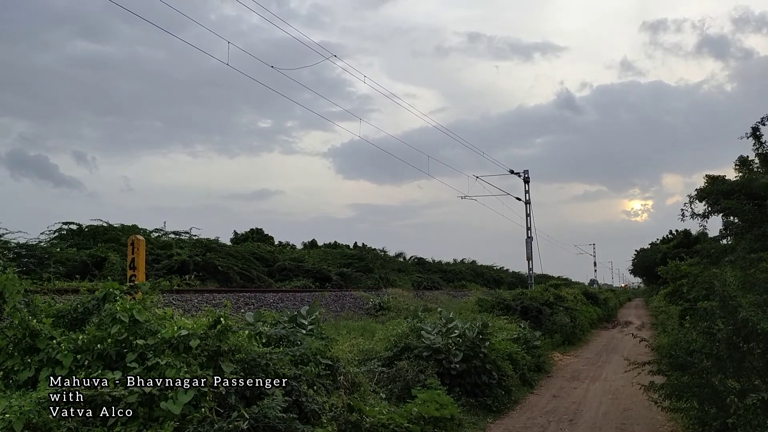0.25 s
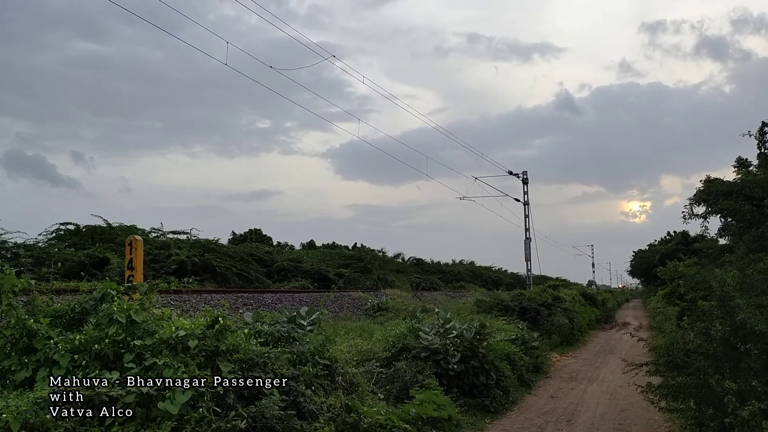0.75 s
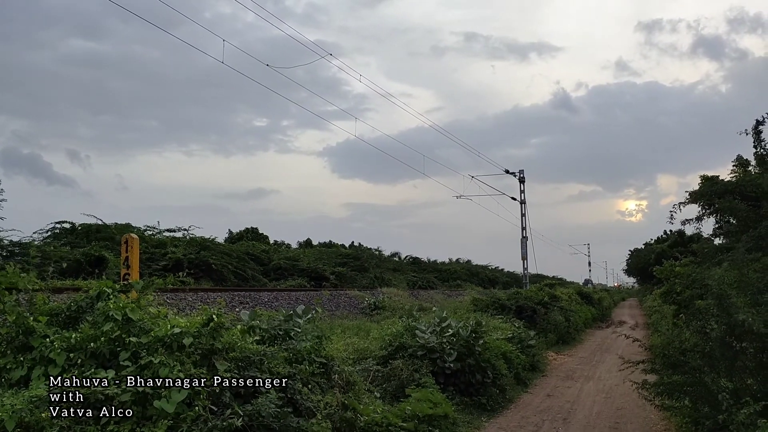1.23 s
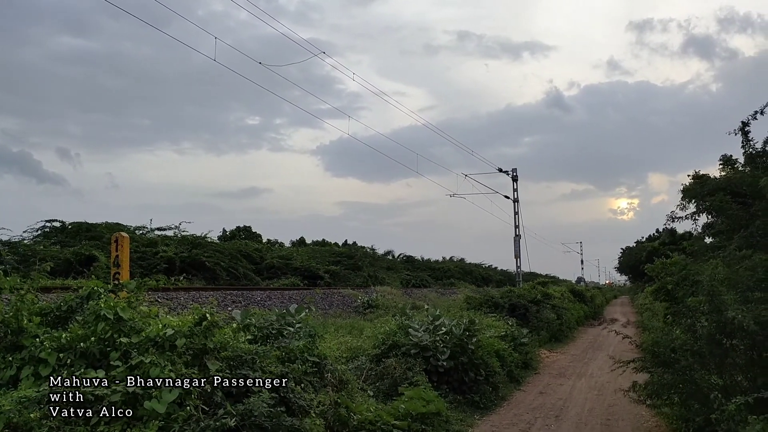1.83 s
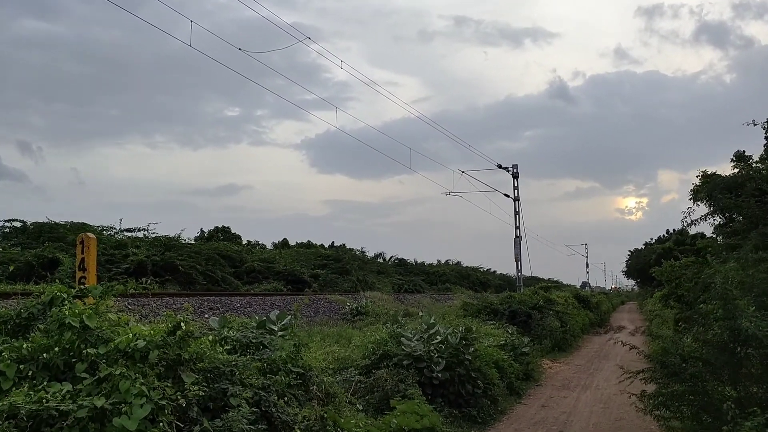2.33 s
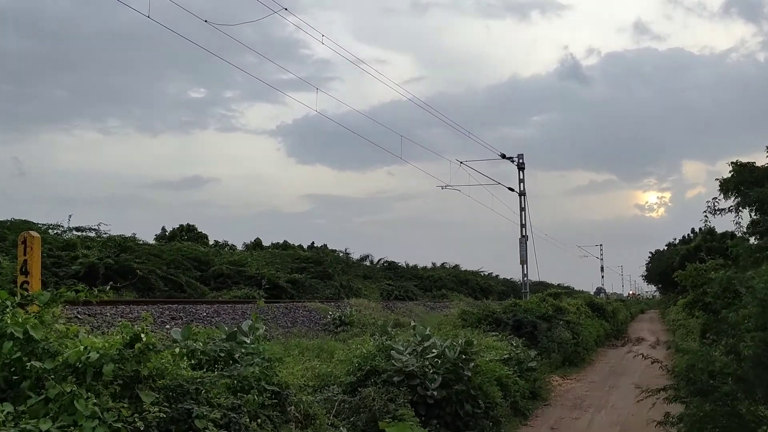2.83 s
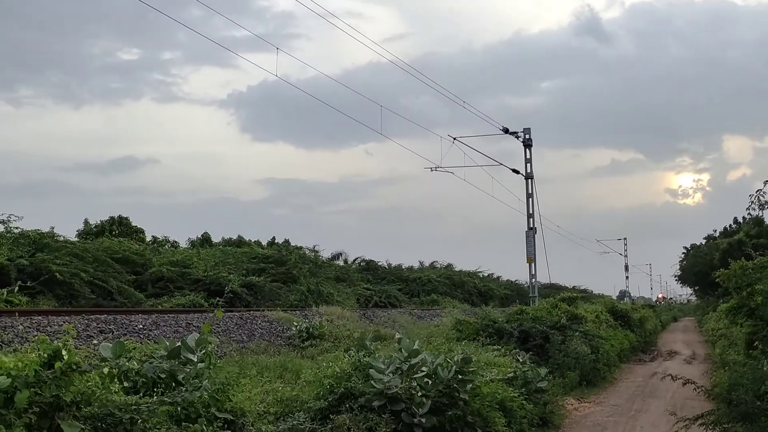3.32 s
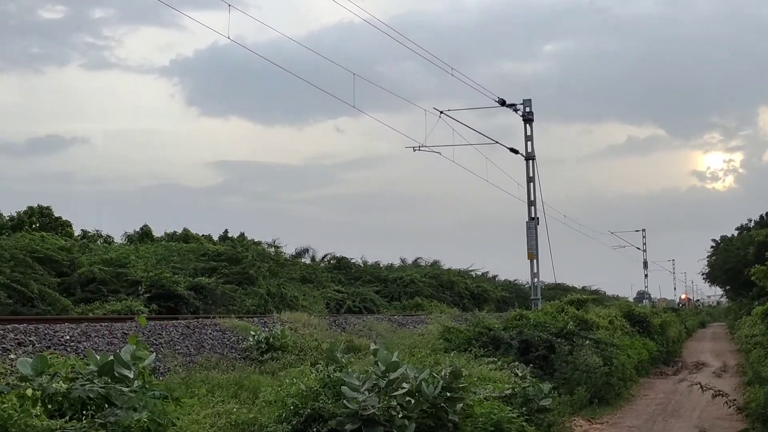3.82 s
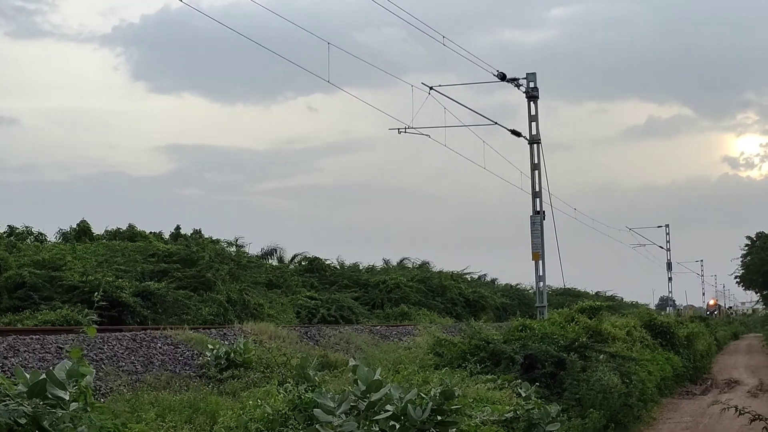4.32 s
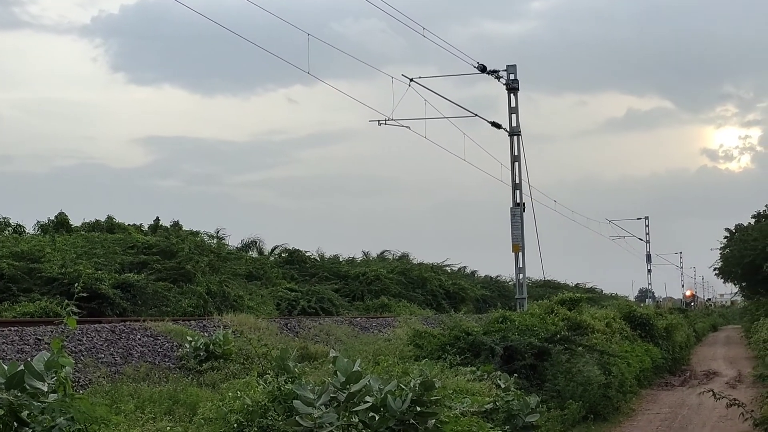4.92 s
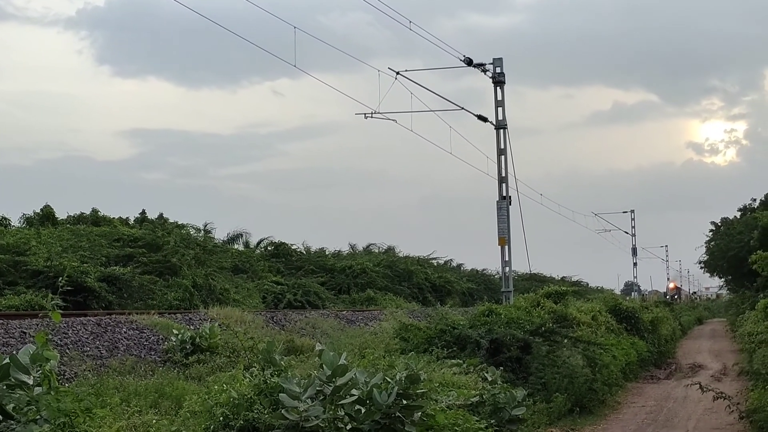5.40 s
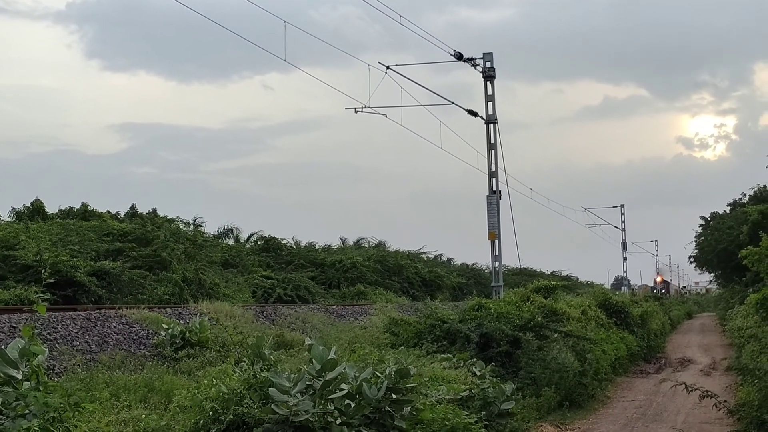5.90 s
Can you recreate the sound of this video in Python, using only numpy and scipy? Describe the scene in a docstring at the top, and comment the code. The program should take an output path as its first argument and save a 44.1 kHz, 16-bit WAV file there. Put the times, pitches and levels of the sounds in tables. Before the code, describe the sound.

Gusty wind thumps the microphone while a far two-tone locomotive air horn sounds long, then short, echoing across scrub alive with insects.

```python
"""A two-chime air horn on a far locomotive, one long and one short blast: stacks of twinkling partials,
air haze, a flat after-hum and a scattered echo from the scrub. Gusts buffet two microphone ports: noise read
at a changing wind speed, over a low rumble. The fields are shaped noise with a chorus of far crickets;
near crickets trill in ringing wing strokes, birds whistle falling tones, and two faint brief tones sound."""
import sys
import numpy as np
from scipy import signal
from scipy.fft import rfft, irfft, next_fast_len
from scipy.io import wavfile
from scipy.ndimage import uniform_filter1d

SR = 44100
rng = np.random.default_rng(int(sys.argv[2]) if len(sys.argv) > 2 else 0)


def waveform_to_disk(signal):
    """Save audio, clipped to [-1, 1], as 16-bit WAV at the path in sys.argv[1]."""
    frames = np.transpose(np.atleast_2d(signal))
    scaled = np.clip(frames, -1, 1) * 32767
    samples = np.round(scaled).astype(np.int16)
    wavfile.write(sys.argv[1], SR, samples)


N = 271215

# Horn blasts: start t/s, valve shuts t/s, release/s, sharpness at start/share of pitch,
# flatness of after-hum/share of pitch, extra level of ringing partial/dB, curve of (t/s, level/dB)
HORN_BLASTS = [(0.563, 2.031, .12, 0.004, 0.015, 3.4, [(.58, -42), (.88, -30), (1.03, -30), (1.35, -25),
               (1.54, -28.5), (1.68, -25), (2.03, -28.5)]),
               (3.587, 4.328, .08, 0.02205, .045, 7.9, [(3.6, -26), (4.33, -24.5)])]
# Chimes, high one first: f/Hz, level of each upper partial under their sum/dB
CHIME_PITCHES = [(473.4, -9), (336.3, -14)]
# Colour of the upper partials after bell, air and ground: f/Hz, level/dB
BELL_COLOUR = [(336, -4), (470, 6), (950, 7), (1010, 9.5), (1400, -2.5), (1700, -4), (2000, 0), (2350, -4),
               (2750, -1.5), (3800, -5), (5200, -7), (7300, -19), (7900, -38), (10000, -42), (12000, -58.5)]
# Horn at the port pair: f/Hz, left minus right/dB, left lead/rad
PORT_DIFFERENCES = [(400, 0, -.35), (1400, 1, -.55), (1750, 5, -2), (2300, 1, -.5), (2800, 4, 1.4),
                    (3400, 5, -.4), (4200, -4, -.7), (6000, 4, 0)]
# Fades of single partials over the long path: t/s, f/Hz, half length/s, depth/dB (negative swells)
PARTIAL_FADES = [(.62, 947, .08, -5), (.74, 473, 0.13, 8), (0.875, 947, 0.091, 11), (0.967, 1009, 0.16, 13),
                 (1.17, 672, 0.046, 12.5), (1.3, 1345, 0.11, -5.5), (1.35, 2018, .15, -5.5),
                 (1.468, 473, 0.2, 8), (1.575, 947, 0.045, 16), (3.724, 473, 0.095, 16.5),
                 (3.75, 2018, .3, 6), (3.86, 1894, 0.071, 13), (4.002, 1009, 0.2, 9),
                 (3.897, 1420, 0.43, -4), (4.16, 947, 0.067, 8), (4.17, 473, 0.21, 13),
                 (4.203, 1345, 0.12, -6.5)]
# Swells of horn bands over the long path: t/s, f/Hz, half length/s, half width/octaves, level/dB
BAND_SWELLS = [(1.046, 2980, 0.1, 0.78, -5), (1.285, 3020, 0.16, 0.29, 4.5), (1.56, 3690, 0.19, 0.13, 7),
               (1.8, 958, 0.25, 0.057, 3.5), (1.8, 4890, 1, .12, -6.5), (4.08, 2970, 0.15, 0.24, -7)]
# Air rushing through the bells: f/Hz, relative level/dB per Hz
HAZE_SPECTRUM = [(700, -11.5), (1400, -9), (2150, -13), (2500, 0.5), (3300, -10), (5000, -2.5),
                 (7300, -16.0), (8200, -32.5), (12000, -49.0)]
# Decay of the scrub echo: f/Hz, time to fall 60 dB/s
ECHO_T60 = [(500, 1.1), (1000, 0.82), (1800, 2.8), (7000, 0.8)]
# Wind rumble: f/Hz, relative level/dB per Hz
RUMBLE_SPECTRUM = [(8, -14), (20, 11), (56, 19), (85, 7), (200, -61)]
# Eddies at unit wind speed: f/Hz, relative level/dB per Hz
EDDY_SPECTRUM = [(30, -41), (80, 0.5), (150, 3.5), (270, -11), (500, -28.5), (1500, -65)]
# Gusts: port, start t/s, length/s, buffeting level at start/dB
PORT_GUSTS = [("left", -.02, .52, -12), ("left", .5, .5, -19), ("left", 1.46, .06, -24),
              ("left", 1.72, .4, -17), ("left", 2.45, .49, -12.5), ("left", 2.99, .62, -18),
              ("left", 3.98, .14, -26), ("left", 5.4, 0.0997, -26), ("left", 5.53, .13, -17),
              ("right", 0.0901, .19, -24), ("right", .31, .36, -15), ("right", .72, .04, -15),
              ("right", 1.1, .03, -21), ("right", 1.475, 0.02005, -24), ("right", 1.91, .07, -19),
              ("right", 2.16, .36, -15), ("right", 2.33, .04, -10), ("right", 2.58, .26, -16),
              ("right", 2.9, .22, -19), ("right", 3.26, .5, -24), ("right", 3.85, .09, -19),
              ("right", 4.13, .12, -21), ("right", 4.8, .18, -23), ("right", 5.22, 0.0202, -21),
              ("right", 5.37, 0.0402, -16), ("right", 5.85, 0.0396, -20)]
# Sudden sharp gusts: t/s, extra speed at left port/dB, at right port/dB; they raise the level alike
GUST_SLAPS = [(.38, 2.5, 2), (.472, 2.5, 2), (2.27, 1, 4), (2.483, 3.5, 0), (2.735, 3, 3.5), (5.608, 2, 0)]
# Rumble: t/s, level/dB
RUMBLE_LEVEL = [(0, -24.5), (.4, -17.5), (1.08, -20), (1.2, -27.5), (2.06, -29.5), (2.34, -20), (3.06, -19),
                (3.5, -21), (3.8, -30), (4.3, -30), (4.95, -28), (5.3, -31), (5.6, -19.5), (5.74, -30),
                (6.13, -25)]
# Field hiss: f/Hz, relative level/dB per Hz
HISS_SPECTRUM = [(300, 14.5), (1200, 13.5), (1650, 5.5), (2400, 11), (4500, -4.5), (8000, -24)]
# Faint top octave of the hiss, alike in both ports: f/Hz, relative level/dB per Hz
AIR_SPECTRUM = [(7500, -3.5), (11500, -13.5)]
# Blurred part of the far chorus: f/Hz, relative level/dB per Hz
BLUR_SPECTRUM = [(4800, -7.5), (5500, 1), (6300, 2.5), (8000, -23.0)]
# Hiss, chorus and echo together: t/s, level/dB
FAR_LEVEL = [(0, -57.5), (.3, -53), (.52, -57.5), (2.2, -49), (2.44, -50.5), (2.6, -60), (2.85, -55),
             (3.3, -49), (4.5, -46), (5.5, -48.5), (5.64, -58), (5.82, -48.5), (6.12, -44)]
# Near crickets: t/s, f/Hz, level/dB, trills in a row
NEAR_TRILLS = [(4.69, 6555, -51, 4), (5.145, 6300, -53, 2), (5.16, 5730, -50, 2), (5.475, 5850, -48, 1),
               (5.705, 6555, -54, 3)]
# Falling bird whistles: t/s, length/s, starting f/Hz, level/dB
BIRD_WHISTLES = [(.15, .105, 2550, -58), (2.385, .05, 2550, -52), (2.64, .04, 6300, -52),
                 (2.7, .04, 6300, -53), (3.24, .06, 2350, -51), (4.592, .04, 6250, -41),
                 (4.65, .05, 6400, -38), (4.715, .045, 6350, -38)]
# Faint brief tones: t/s, length/s, f/Hz, level/dB
FAINT_TONES = [(4.985, .12, 2335, -51), (5.985, .025, 1200, -46)]

EDGE_HZ = 12200  # upper band limit
LULL_DB, SAG_DB_PER_S, GUST_EDGE_DB_PER_S = -38., 9., 650.
CHORUS_DB = -0.5  # over the hiss
TRILL_S, TRILL_EVERY_S = .085, .108
BIRD_FALL_S = 0.062
RING_HZ, RING_OCTAVES = 2367, .005  # a strong, steadier partial of the high chime
RELEASE_DB_PER_S = 214  # at 1 kHz; higher partials die sooner
HUM_DB, HUM_S, HUM_SAG_S = -21.5, 0.26, .06
FAR_ECHO_S, FAR_ECHO_DB = 1.35, -19.


def amp(db):
    """Decibels to gain."""
    return 10 ** (np.asarray(db) / 20)


def evened(x):
    """Scales each row to rms 1."""
    return x / np.sqrt(np.mean(abs(x) ** 2, axis=-1, keepdims=True) + 1e-20)


def read(points, hz):
    """Reads the columns of a spectrum table on a log-frequency axis."""
    f, *columns = np.transpose(points)
    return [np.interp(np.log(hz + 1), np.log(f + 1), c) for c in columns]


def curve(rows, t):
    """Joins the (t/s, level/dB) rows by straight lines."""
    s, level_db = np.transpose(rows)
    return np.interp(t, s, level_db)


def noise(points, count, size=N, rate=SR):
    """Rows of noise with the given spectrum, each at rms 1."""
    padded = next_fast_len(size)
    gain = amp(read(points, np.fft.rfftfreq(padded, 1 / rate))[0])
    white = rng.standard_normal((count, padded))
    return evened(irfft(rfft(white) * gain, padded)[:, :size])


def drift(hz, count, size=N):
    """Rows of slow chance, mostly below hz, made coarsely and joined by lines."""
    step = 32
    spectrum = [(hz, 0), (10 * hz, -28), (50 * hz, -70)]
    coarse = noise(spectrum, count=count, size=size // step + 2, rate=SR / step)
    at = np.arange(size) / step
    return np.array([np.interp(at, np.arange(len(row)), row) for row in coarse])


def add(mix, s, sound):
    """Mixes a sound in at a time, in place."""
    part = mix[..., round(s * SR):][..., :sound.shape[-1]]
    part += sound[..., :part.shape[-1]]


def to_ports(x, pan_db):
    """Sets the level difference, left minus right, between the ports."""
    return x * amp([[pan_db / 2], [-pan_db / 2]])


def swell_db(t, hz):
    """Sum of the band swells at these times and frequencies."""
    total_db = 0
    for s, mid_hz, half_s, wide_octaves, db in BAND_SWELLS:
        octaves = np.log2((hz + 1) / mid_hz)
        total_db = total_db + db * np.exp(-((t - s) / half_s) ** 2 - (octaves / wide_octaves) ** 2)
    return total_db


def patchy(x, start, patch_db, swell):
    """Lets random patches of time and frequency come and go, with a share of the band swells."""
    hz, t, z = signal.stft(x, SR, nperseg=512)
    field = rng.standard_normal(z.shape[1:])
    field = uniform_filter1d(uniform_filter1d(field, size=6, axis=0), size=9, axis=1)
    db = patch_db * field / field.std() + swell * swell_db(start + t, hz[:, None])
    return signal.istft(z * amp(db), SR, nperseg=512)[1][:, :x.shape[1]]


def gusts(t):
    """Buffeting dB at both ports: each gust sets in fast, sags and drops out; the strongest rules."""
    port_db = {"left": LULL_DB + 0 * t, "right": LULL_DB + 0 * t}
    for port, s, length_s, db in PORT_GUSTS:
        outside_s = np.maximum(0, np.maximum(s - t, t - s - length_s))
        gust_db = db - SAG_DB_PER_S * (t - s) - GUST_EDGE_DB_PER_S * outside_s
        port_db[port] = np.maximum(port_db[port], gust_db)
    return np.array([port_db["left"], port_db["right"]])


def rumble(t, port_db, flicker):
    """Low wind noise that follows the breeze, flickers and leans to the windier port."""
    lean_db = 0.19 * (port_db - port_db[::-1])
    level_db = curve(RUMBLE_LEVEL, t) + lean_db + 4.48 * flicker
    return np.sqrt(2) * noise(RUMBLE_SPECTRUM, count=2) * amp(level_db)


def buffeting(t, port_db, flicker):
    """Frozen eddies are blown past each port: faster air is louder and brighter."""
    slap_db = sum(np.outer(db, np.exp(-((t - s) / .015) ** 2)) for s, *db in GUST_SLAPS)
    speed = np.clip(amp(.24 * (port_db + 19) + .9 * flicker + slap_db), .4, 1.8)
    place = np.cumsum(speed, axis=1)
    eddies = noise(EDDY_SPECTRUM, count=2, size=2 * N)
    passing = np.array([np.interp(p, np.arange(2 * N), e) for p, e in zip(place, eddies)])
    return passing * amp(port_db + 1.74 * flicker + slap_db)


def wind():
    """Rumble and buffeting share the gusts and the flicker of the wind speed at each port."""
    t = np.arange(N) / SR
    port_db = gusts(t) + .9 * drift(6, count=2)
    flicker = drift(30, count=2)
    both = rumble(t, port_db, flicker) + buffeting(t, port_db, flicker)
    return both * np.minimum(t * 200, 1)


def field_hiss():
    """Wide patchy noise with a faint common top octave."""
    hiss = noise(HISS_SPECTRUM, count=2) + amp(-10.5) * noise(AIR_SPECTRUM, count=1)
    return patchy(hiss, 0, patch_db=2.5, swell=0) * amp(1.4 * drift(12, count=1))


def trill(hz, size, rough=0.31, sharp=4):
    """Wing strokes, about 125 a second, each a short ringing burst."""
    t = np.arange(size) / SR
    strokes = np.cumsum(125 * (1 + 0.0448 * drift(4.6, count=1, size=size)[0])) / SR
    jitter_rad = rough * 10 * drift(33.6, count=1, size=size)[0]
    ring = np.sin(2 * np.pi * hz * t + jitter_rad)
    return evened(ring * abs(np.sin(np.pi * strokes)) ** sharp)


def cricket_chorus():
    """Four far crickets come and go, mixed differently at each port, over a blur of noise."""
    singers = np.array([trill(hz, N, rough=.15, sharp=1.2) for hz in (5760, 5820, 5880, 5950)])
    singers *= amp(5. * drift(9.0, count=4))
    blur = noise(BLUR_SPECTRUM, count=2)
    return evened(rng.uniform(0.23, 1, (2, 4)) @ singers) + 0.81 * blur


def fields(echo):
    """Hiss, chorus and returning echo under one far level."""
    far_db = curve(FAR_LEVEL, np.arange(N) / SR)
    # the returns waver in the moving air
    echo = patchy(echo, 0, patch_db=2.8, swell=0) * amp(28.5)
    return (field_hiss() + echo + cricket_chorus() * amp(CHORUS_DB)) * amp(far_db)


def bird_whistles(out):
    """Sines that fall by about a fifth of their frequency; a long call starts level."""
    for s, length_s, hz, db in BIRD_WHISTLES:
        size = round(length_s * SR)
        fall = np.maximum(np.linspace(min(1 - length_s / BIRD_FALL_S, 0), 1, size), 0) ** 1.3
        turns = np.cumsum(hz * (1 - 0.192 * fall)) / SR
        add(out, s, amp(db) * np.sin(2 * np.pi * turns) * signal.windows.tukey(size, .6))


def near_crickets(out):
    """Short trills, singly or in even rows."""
    size = round(TRILL_S * SR)
    for s, hz, db, count in NEAR_TRILLS:
        for k in range(count):
            chirp = trill(hz, size, rough=0.033) * signal.windows.tukey(size, .3)
            add(out, s + k * TRILL_EVERY_S, amp(db) * chirp)


def faint_tones(out):
    """Steady sines under a half-sine envelope."""
    for s, length_s, hz, db in FAINT_TONES:
        t = np.arange(0, length_s, 1 / SR)
        add(out, s, amp(db) * np.sin(2 * np.pi * hz * t) * np.sin(np.pi * t / length_s))


def calls():
    """Whistles, near trills and faint tones, a little stronger at the right port."""
    out = np.zeros(N)
    bird_whistles(out)
    near_crickets(out)
    faint_tones(out)
    return to_ports(out, -1.0)


def partial(t, k, f0_hz, turns, level_db, ring_db, fall_db):
    """One harmonic of a chime; turbulent air makes it twinkle, the high ones most."""
    hz = k * f0_hz
    khz = hz / 1000
    pan_db, lead_rad = read(PORT_DIFFERENCES, hz)
    ring = np.exp(-(np.log2(hz / RING_HZ) / RING_OCTAVES) ** 2)
    db = level_db + read(BELL_COLOUR, hz)[0] + ring_db * ring - fall_db * khz ** 0.44
    for s, fade_hz, half_s, deep_db in PARTIAL_FADES:
        if round(fade_hz / f0_hz - k, 1) == 0:
            db -= deep_db * np.exp(-((t - s) / half_s) ** 2)
    db += np.repeat(swell_db(t[::64], hz), 64)[:len(t)]
    a, b, c, d = drift(6.8, count=4, size=len(t))
    depth = min(0.26 * khz ** 0.75, .75) / (1 + ring)
    apart = min(0.22 * khz, .7)  # the ports share less of the twinkle at short wavelengths
    twinkle = 1 + depth * (a + 1j * b + apart * np.outer([1, -1], c + 1j * d))
    side = to_ports(np.exp(.5j * np.array([[lead_rad], [-lead_rad]])), pan_db)
    wave = np.exp(2j * np.pi * (k * turns + rng.random()))
    return amp(db) * (twinkle * side * wave).real / np.sqrt(.5 + depth ** 2)


def bell_air(start, level_db, fall_db):
    """Air rushing through the bells: patchy noise that follows the blast."""
    haze = noise(HAZE_SPECTRUM, count=2, size=len(level_db))
    return amp(level_db - 11.5 - 1.3 * fall_db) * patchy(haze, start, patch_db=4.0, swell=0.62)


def blast(start, shut, release, sharp, ring_db, level):
    """Two diaphragms beat stacks of partials, with the rush of air around them."""
    t = np.arange(start, shut + release, 1 / SR)
    level_db = curve(level, t)
    fall_db = RELEASE_DB_PER_S * np.maximum(t - shut, 0)
    # sharp while the pressure builds, sagging as the valve shuts
    build = sharp * np.exp(-(t - t[0]) / .04)
    sag = .015 * np.clip((t - t[-1]) / .07 + 1, 0, 1)
    bend = 1 + build - sag
    out = np.zeros((2, len(t)))
    for f0_hz, chime_db in CHIME_PITCHES:
        waver = 1 + 0.000793 * drift(2.92, count=1, size=len(t))[0]
        turns = np.cumsum(f0_hz * bend * waver) / SR
        for k in range(1, int(EDGE_HZ / f0_hz)):
            out += partial(t, k, f0_hz, turns, level_db + chime_db, ring_db, fall_db)
    out += bell_air(start, level_db, fall_db)
    edge = np.clip(np.minimum(t - t[0], t[-1] - t) / .015, 0, 1)
    return t[0], out * edge


def hum(sag, last_db):
    """The high chime's second partial hums on, sliding flat, as the last air escapes."""
    t = np.arange(0, HUM_S, 1 / SR)
    slide = 1 - sag * (1 - np.exp(-(t / HUM_SAG_S) ** 2))
    turns = np.cumsum(2 * CHIME_PITCHES[0][0] * slide) / SR
    return amp(last_db + HUM_DB) * np.sin(2 * np.pi * turns) * signal.windows.tukey(len(t), .5)


def horn_blasts():
    """Both blasts with their after-hums; loud waves steepen and yield sum tones of the chimes."""
    horn = np.zeros((2, N))
    for start, shut, release, sharp, sag, ring_db, level in HORN_BLASTS:
        add(horn, *blast(start, shut, release, sharp, ring_db, level))
        add(horn, shut, hum(sag, level[-1][1]))
    squared = horn ** 2
    return horn + 0.1 * (squared - uniform_filter1d(squared, 200))


def scrub_echo(x):
    """Scattered returns from bushes and embankment: sparse taps, decaying at a rate set by frequency."""
    size = 3 * SR // 2
    taps = np.zeros((2, size))
    at = np.arange(800, size - 40, 40) + rng.integers(0, 40, (2, (size - 801) // 40))
    np.put_along_axis(taps, at, rng.choice([-1., 1.], at.shape), 1)
    hz, t, z = signal.stft(taps, SR, nperseg=256)
    t60_s = read(ECHO_T60, hz)[0]
    tail = signal.istft(z * amp(-60 * t / t60_s[:, None]), SR, nperseg=256)[1]
    tail = tail / np.linalg.norm(tail[0])
    slope = signal.windows.hann(24) / 12  # one late, dull return from a distant slope
    add(tail, FAR_ECHO_S, amp(FAR_ECHO_DB) * slope)
    return signal.fftconvolve(x.mean(0)[None], tail, axes=1)[:, :N]


def scene():
    """Horn, wind, far sound with the horn's echo, and calls."""
    horn = horn_blasts()
    return horn + wind() + fields(scrub_echo(horn)) + calls()


def record(dry):
    """Soft overload on the loudest peaks, then the band limit."""
    soft = 0.86 * np.tanh(dry / 0.9)
    lowpass = signal.firwin(511, EDGE_HZ, window=("kaiser", 9), fs=SR)
    return signal.oaconvolve(soft, lowpass[None], "same")


dry = scene()
out = record(dry)
waveform_to_disk(out)
```